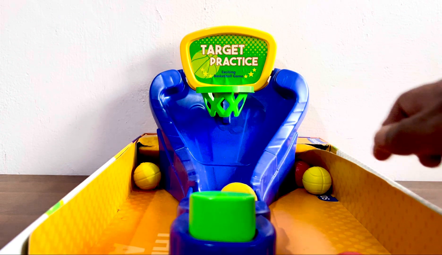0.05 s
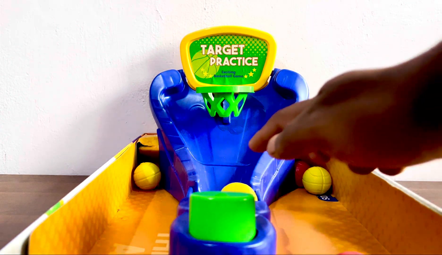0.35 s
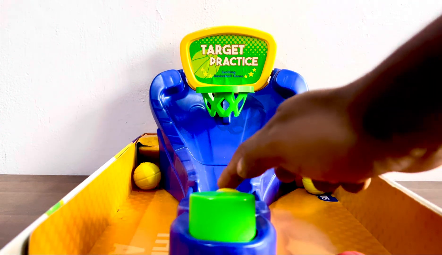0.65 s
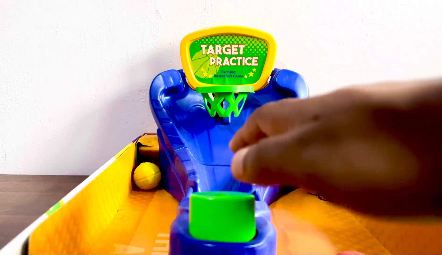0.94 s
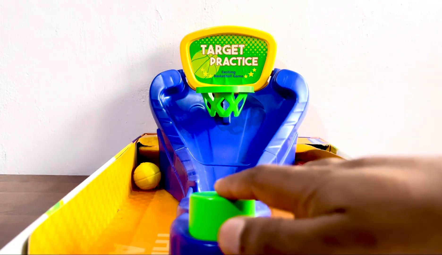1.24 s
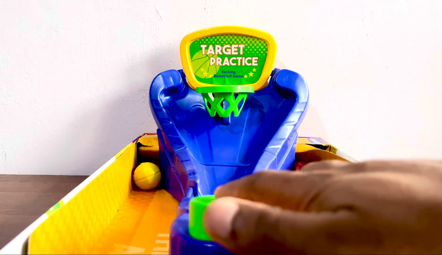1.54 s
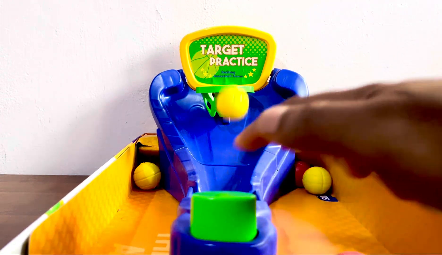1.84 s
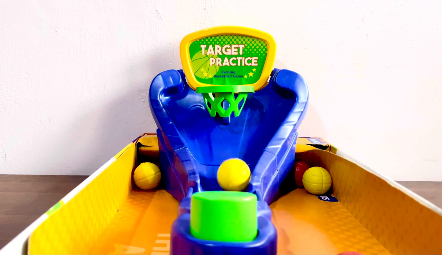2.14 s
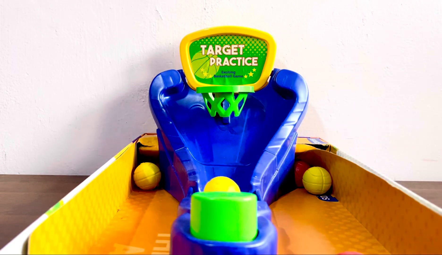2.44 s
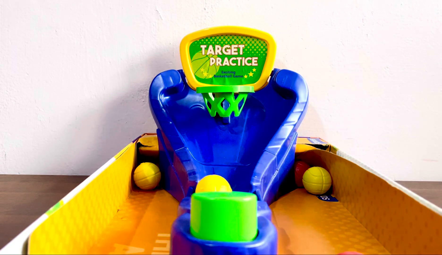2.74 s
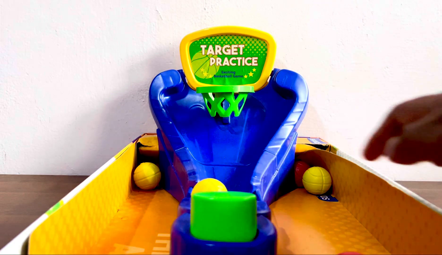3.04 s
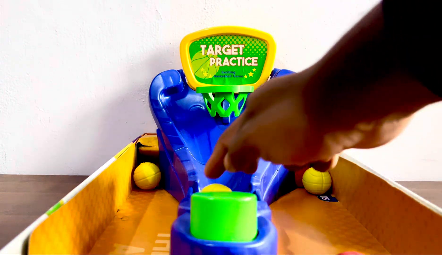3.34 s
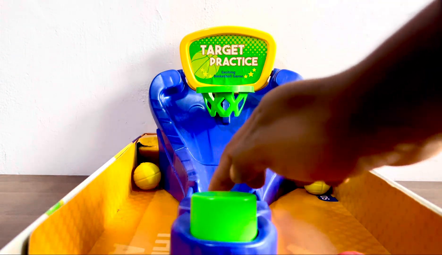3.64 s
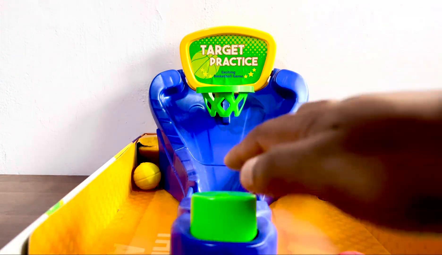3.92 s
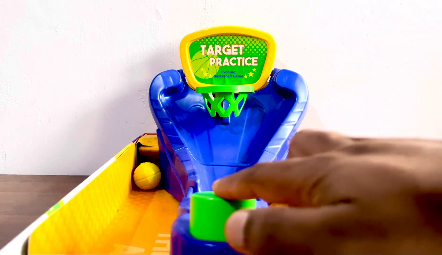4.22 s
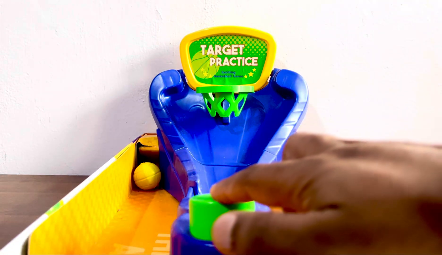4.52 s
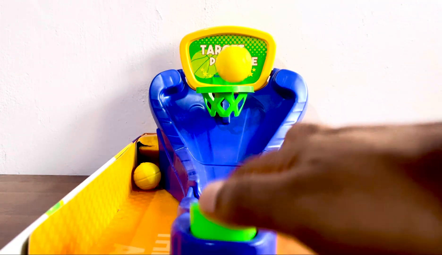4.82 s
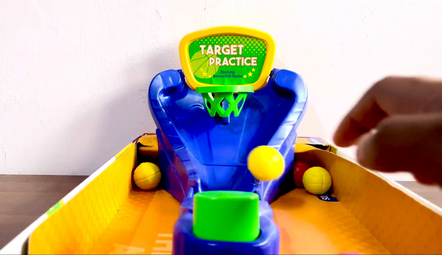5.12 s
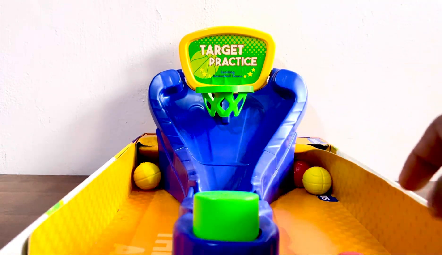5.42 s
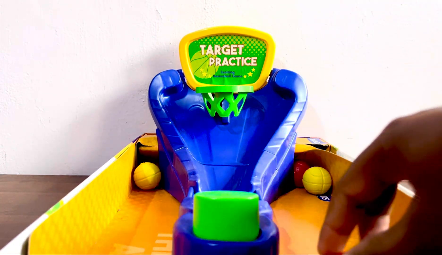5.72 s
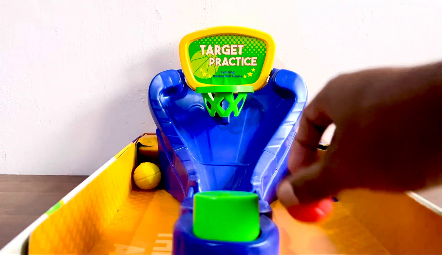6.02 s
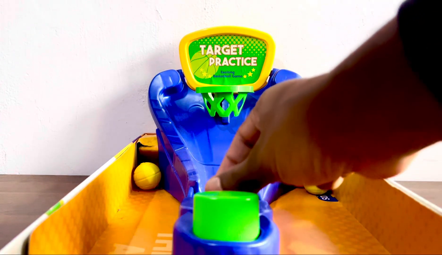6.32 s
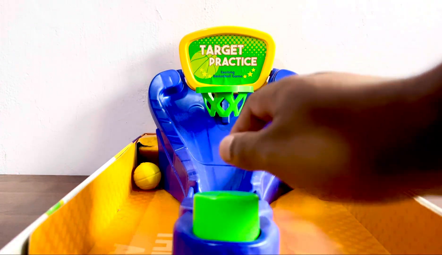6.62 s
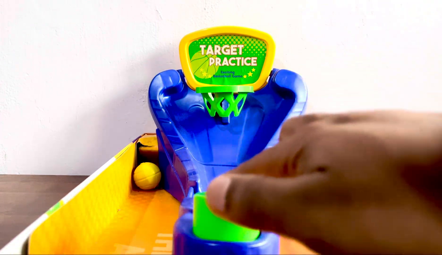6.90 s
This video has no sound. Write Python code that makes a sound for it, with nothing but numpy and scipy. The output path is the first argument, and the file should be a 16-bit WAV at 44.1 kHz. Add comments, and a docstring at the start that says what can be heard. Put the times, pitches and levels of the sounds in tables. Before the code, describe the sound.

In a small, quiet room, close by, fingers jiggle a hollow ball into a plastic tabletop basketball toy with soft clicks and rubbing. A spring lever creaks faintly and snaps, and the ball knocks against backboard and chute before rattling to rest. After more reloading, a second shot clatters, drops into a cardboard tray and rolls. Light handling clicks follow at the end.

```python
"""Soft hollow clicks and rubbing: fingers jiggle a ball into place in a plastic tabletop basketball toy.
Twice a spring lever creaks, slips and slams into its stop, and the hollow ball knocks against backboard
and chute. The first shot rattles back to the launcher; the second drops into a cardboard tray and rolls.
More reloading follows each shot. Every impact excites the damped modes of the thin plastic shell,
and the table booms beneath it, in a small, quiet room."""
import sys
import numpy as np
from scipy import signal
from scipy.fft import rfft, irfft, next_fast_len
from scipy.io import wavfile
from scipy.ndimage import uniform_filter1d

SR = 44100
rng = np.random.default_rng(int(sys.argv[2]) if len(sys.argv) > 2 else 0)


def bounce(signal):
    """Save signal as a 16-bit WAV file at the path given by the first command-line argument."""
    frames = np.transpose(np.atleast_2d(signal))
    limited = np.clip(frames, -1, 1)
    pcm = np.round(limited * 32767).astype(np.int16)
    wavfile.write(sys.argv[1], SR, pcm)


N = 311346


def amp(db):
    """Amplitude ratio of a level in decibels."""
    return 10 ** (np.asarray(db) / 20)

def read(points, hz):
    """Interpolation of a spectrum on a logarithmic frequency axis."""
    f, value = np.transpose(points)
    return np.interp(np.log(hz + 1), np.log(f), value)

def unit(x):
    """Normalisation to a mean energy of one per channel."""
    return x / np.sqrt(np.mean(np.sum(x ** 2, axis=-1)) + 1e-20)

def add(mix, start_s, sound):
    """Superposition: a stereo sound joins the mix at start_s."""
    part = mix[:, max(round(start_s * SR), 0):][:, :sound.shape[1]]
    part += sound[:, :part.shape[1]]

def colour(x, spectrum):
    """Filtering by multiplication in the frequency domain."""
    size = next_fast_len(x.shape[-1], True)
    gain = amp(read(spectrum, np.fft.rfftfreq(size, 1 / SR)))
    return irfft(rfft(x, size) * gain, size)[..., :x.shape[-1]]

# Likeness of the left and right channels: frequency_hz, coherence
COHERENCE = [(100, .95), (400, .85), (1200, .58), (2500, .05), (7000, 0), (13000, .35)]
def noise(size):
    """A diffuse field is coherent at two nearby points for long wavelengths only."""
    padded = next_fast_len(size, True)
    a, b = rfft(rng.standard_normal((2, padded)))
    same = read(COHERENCE, np.fft.rfftfreq(padded, 1 / SR))
    return irfft(np.array([a, same * a + np.sqrt(1 - same ** 2) * b]), padded)[:, :size]

def phase_lag(hz):
    """Left and right phase of a mode: the cosine of their difference equals the coherence."""
    return np.arccos(read(COHERENCE, hz)) * np.array([[0], [1]])

# Spectrum of the still room: frequency_hz, level_db
AIR = [(25, -15), (110, -6), (280, -14), (600, -14), (1200, -11), (1900, -22), (4000, -24), (8000, -37.5),
       (13000, -39), (16000, -70)]
def room_air(level_db=-72):
    """Ambient noise: steady, diffuse and strongest in the bass."""
    return amp(level_db) * unit(colour(noise(N), AIR)) * np.sqrt(N)

# Weight of the hand on toy and table: time_s, level_db
HAND_WEIGHT = [(0.3, -95), (0.55, -64), (1.4, -69), (3.35, -68), (3.8, -63.5), (4.3, -69.5), (5.7, -62.5),
               (6.1, -86.5), (6.6, -74)]
# Spectrum of its rumble: frequency_hz, level_db
THUD = [(35, -13), (110, 1), (380, -3.5), (800, -33), (3000, -70)]
def resting_hand(lumps_db=3, lump_s=0.092):
    """Structure-borne noise: a shifting hand makes a low, lumpy rumble."""
    t, knots = np.arange(N) / SR, np.arange(0, N / SR, lump_s)
    lumps = lumps_db * np.interp(t, knots, rng.standard_normal(len(knots)))
    level = np.interp(t, *np.transpose(HAND_WEIGHT)) + lumps
    return amp(level) * unit(colour(noise(N), THUD)) * np.sqrt(N)

def panel_ring(modes_hz, size, t60=.17):
    """Modal weighting: each spot on the thin panels favours different high modes."""
    t = np.arange(size // 3) / SR
    ring = sum(rng.standard_normal() * np.sin(2 * np.pi * (hz * t + rng.random((2, 1))))
               for hz in modes_hz)
    return np.pad(unit(ring * amp(-60 * t / t60)), ((0, 0), (0, size - len(t))))

# Reverberation time: frequency_hz, t60_s
ROOM_T60 = [(100, .7), (500, 0.48), (1200, .46), (4000, 0.28), (8000, 0.36), (14000, 0.46)]
# Reverberation against the direct sound: frequency_hz, level_db
ROOM_LEVEL = [(100, -0.5), (500, -4.5), (1100, -4), (2500, -0.5), (5000, 2), (13300, -10), (15000, -22)]
def surroundings(modes_hz, size=24576, scatter_db=-9.5, panel_db=-9, wall_s=.0139, wall_db=-12):
    """Impulse response of one spot: reverberation, scatter in the tray, panels, direct sound, echo."""
    t = np.arange(size) / SR
    hz, when, bands = signal.stft(noise(size), SR, nperseg=256)
    t60 = read(ROOM_T60, hz)[:, None]
    bands = bands * amp(read(ROOM_LEVEL, hz)[:, None] - 60 * when / t60)
    bands *= np.sqrt(2 * np.log(1000) / (t60 * SR))  # energy independent of decay time
    response = signal.istft(bands, SR, nperseg=256)[1][:, :size] * (1 - np.exp(-t / 0.0017))
    scatter = noise(size) * np.exp(-t / .011) * np.clip(t / 0.0011 - 1, 0, 1)
    response += amp(scatter_db) * unit(scatter)
    response += amp(panel_db) * panel_ring(modes_hz, size)
    response[:, 0] += 1
    response[:, round(wall_s * SR)] += amp(wall_db)
    return response

# Modes of the table under the toy: pitch_hz, level_db, t60_s
TABLE_MODES = [(77, -42, 0.67), (102, -34, 0.22), (186, -38, 0.16), (275, -34.5, 0.07)]
def table_boom(contacts, gain_db):
    """Mechanical coupling: blows on the toy excite the low modes of the table."""
    t, out = np.arange(SR) / SR, np.zeros((2, N))
    ring = sum(amp(db - 60 * t / t60) * np.sin(2 * np.pi * hz * t) for hz, db, t60 in TABLE_MODES)
    ring = np.tile(ring * (1 - np.exp(-t / 0.0084)) ** 2, (2, 1))
    for start, knock, *_ in contacts:
        add(out, start, amp(knock + gain_db) * ring)
    return out

# Modes of the plastic shell: pitch_hz, gain_db, t60_s
SHELL_MODES = [(521, 3, 0.38), (609.4, 4.5, .25), (866, -2, 0.25), (966, -1, 0.17), (1127, -3, 0.31),
               (1190, -3, .2), (1333, -.5, 0.14), (1426, 4.5, 0.27), (1550, -.5, 0.11), (2223, -1, .06),
               (3280, -4.5, 0.16)]
def shell(force, ring_db):
    """Forced vibration: knocks and rubbing drive the same modes, and so sound hollow and pitched."""
    t, ring = np.arange(SR // 2) / SR, 0
    for hz, db, t60 in SHELL_MODES:
        envelope = 2 * np.log(1000) / (t60 * SR) * amp(db - 60 * t / t60)
        ring = ring + envelope * np.sin(2 * np.pi * hz * t - phase_lag(hz))
    return force + amp(ring_db) * signal.oaconvolve(force, ring, axes=1)[:, :N]

def stroke(t, start, length, rise_s=0.053, fall_s=0.021):
    """Envelope of a rub: linear rise, hold, exponential decay."""
    return np.clip((t - start) / rise_s, 0, 1) * np.exp(-np.maximum(t - start - length, 0) / fall_s)

# The ball rolls or the fingers rub: start_s, length_s, rumble_db, scratch_db
STROKES = [(0.58, 0.32, -39.5, -60), (0.889, 0.29, -59, -109), (2.15, 0.057, -32.5, -50.5),
           (2.313, .18, -33.5, -59.5), (3.442, 0.096, -50.5, -66), (3.522, 0.21, -39.5, -63.5),
           (3.804, 0.29, -47, -88), (4.17, 0.08, -51.5, -67), (4.355, .14, -54, -106.5),
           (5.31, 0.25, -51.5, -62), (5.522, 0.16, -48, -53), (5.766, 0.054, -55.5, -54),
           (6.476, 0.11, -37, -77), (6.615, 0.27, -53, -98)]
PRESS_S = 0.18  # the finger bears on the button this long before each shot
def friction(t, press_db=-55, drag_db=-35.5, drag_db_per_s=271.5, scratch_db=-35, scratch_db_per_s=480):
    """Friction noise follows the load: the strokes, then the press and growing drag before each shot."""
    rumble, scratch = sum(amp([[low], [high]]) * stroke(t, start, length)
                          for start, length, low, high in STROKES)
    for slip, *_ in SHOTS:
        early = np.maximum(slip - t, 0)
        rumble += amp(press_db) * stroke(t, slip - PRESS_S, PRESS_S)
        rumble += amp(drag_db - drag_db_per_s * early) * (t < slip)
        scratch += amp(scratch_db - scratch_db_per_s * early) * (t < slip)
    return rumble, scratch

# Spectra of rumbling and of scratched plastic: frequency_hz, level_db
RUMBLE = [(30, -43), (60, -27.5), (120, -11), (280, -24), (450, 3.5), (700, 2), (1000, 5.5), (1480, 2.5),
          (1850, -15.5), (2600, -18), (5000, -40), (12000, -56.5)]
SCRATCH = [(700, -14), (1800, 4), (3000, 2), (5000, -5), (8300, -10), (11000, -5.5), (13300, -13),
           (15000, -25)]
def rolling(spot, rumble_db=-10, scratch_db=-5, bumps_per_s=420, spread_db=-1.5):
    """Shot noise: the ball's seam and the fingertips make a random stream of tiny, uneven bumps."""
    t, out = np.arange(N) / SR, np.zeros((2, N))
    bumps = (rng.random(N) < bumps_per_s / SR) * amp(spread_db * np.minimum(rng.exponential(1, N), 3))
    grains = noise(N) * signal.lfilter([1], [1, -np.exp(-1 / (0.00023 * SR))], bumps)
    for spectrum, db, level in zip([RUMBLE, SCRATCH], [rumble_db, scratch_db], friction(t)):
        out += amp(db) * uniform_filter1d(level, size=600) * unit(colour(grains, spectrum)) * np.sqrt(N)
    return signal.oaconvolve(out, spot, axes=1)[:, :N]

def flex(t, hz, swell_s, lag_rad):
    """Heavily damped bending: a panel swings for a few cycles, lagging in phase on the right."""
    u = t / swell_s
    return unit(u ** 2 * np.exp(-u) * np.sin(2 * np.pi * hz * t - np.array([[0], [lag_rad]])))

def crack(t, spectrum, rise_s, decay_s):
    """Modal overlap: the many short-lived modes of thin plastic merge into a noise burst."""
    return unit(colour(noise(len(t)), spectrum) * np.exp(-t / decay_s) * (1 - np.exp(-t / rise_s)))

def wall_ring(t, low_hz=1700, high_hz=7400, t60=0.016, count=20):
    """Local resonance: each spot on the thin walls rings briefly with its own modes."""
    hz = low_hz * (high_hz / low_hz) ** rng.random((count, 1, 1))
    modes = np.sin(2 * np.pi * (hz * t + rng.random((count, 2, 1)))) / np.sqrt(hz)
    return unit(np.sum(modes, 0) * amp(-60 * t / t60) * (1 - np.exp(-t / 0.0054)))

def ring_on(contacts, modes, rise_s=0.0032):
    """Free vibration: the modes of a struck part decay exponentially after each blow."""
    out, t = np.zeros((2, N)), np.arange(SR // 2) / SR
    for start, level, *_ in contacts:
        for hz, db, t60 in modes:
            envelope = amp(level + db - 60 * t / t60) * (1 - np.exp(-t / rise_s))
            add(out, start, envelope * np.sin(2 * np.pi * (hz * t + rng.random()) - phase_lag(hz)))
    return out

def contact(start, level, hz, hardness_db, hollow_db):
    """Harder contacts are brighter. Gives start_s, knock_db, pitch_hz, body_db, clack_db, tick_db."""
    return start, level, hz, level + hollow_db, level - 9 + hardness_db, level - 17 + 1.3 * hardness_db

# Spectra of the clack and the higher tick of struck plastic: frequency_hz, level_db
CLACK = [(600, -12.5), (1400, -6), (2100, 9), (3000, -0.5), (4400, -2), (6200, -11.5), (7500, -17),
         (10000, -26)]
TICK = [(4000, -20), (7000, -2), (8500, -5.5), (10300, 2), (13000, -1.5), (14300, -11.5), (16000, -23)]
def blows(contacts, spots, knock_db, rattle_db, body_db, clack_db, tick_db,
          swell_s, rise_s, crack_s, body_hz, ring_db=-4):
    """Impact excitation: each contact flexes panel and hollow base, rattles loose joints and clacks."""
    out, t = np.zeros((2, N)), np.arange(2000) / SR
    for k, (start, knock, hz, body, clack, tick) in enumerate(contacts):
        hit = amp(knock + knock_db) * flex(t, hz, swell_s, lag_rad=0.59)
        hit += amp(knock + rattle_db) * crack(t, RUMBLE, rise_s=.004, decay_s=.008)
        hit += amp(body + body_db) * flex(t, body_hz * rng.uniform(.94, 1.2), 0.0015, lag_rad=0.32)
        hit += amp(clack + clack_db) * crack(t, CLACK, rise_s, crack_s)
        hit += amp(clack + ring_db) * wall_ring(t)
        hit += amp(tick + tick_db) * crack(t, TICK, rise_s, crack_s * 0.92)
        add(out, start, signal.fftconvolve(hit, spots[k % len(spots)], axes=1))
    return out

def nudge(start, level, hz, bite_db=0, brightening=1.827):
    """Nonlinear contact: the clack grows faster than the force, and a fingernail adds bite."""
    clack = brightening * level + bite_db
    return start, level, hz, level - 10, clack, clack - 7 + (clack - level) / 2

# Fingers nudge the ball: start_s, level_db, pitch_hz, bite_db
NUDGES = [(0.616, -14.5, 920, 2.5), (0.632, -19, 900, 11.5), (0.694, -10, 1620, 3.5),
          (0.722, -8.5, 1480, 1), (0.737, -14, 1200, 9.5), (0.775, -6.5, 1160, 4), (0.798, -5.5, 1450, 1),
          (0.843, -10.5, 1070, 3), (0.876, -17.5, 1190, 10), (2.619, -17, 1382, -17), (2.837, -32, 1083, 5),
          (2.997, -21, 1383, 6), (3.327, -23.5, 1400, 2), (3.544, -13.5, 1500, 9.5),
          (3.632, -16, 1295, 12.5), (3.665, -15, 870, 4.5), (3.73, -17, 1450, 4.5),
          (3.841, -22.5, 1035, 5.5), (3.905, -17.5, 1143, 2.5), (4.064, -18.5, 1330, -8),
          (6.352, -14.5, 1055, 6), (6.38, -8.5, 1015, -1.5), (6.385, -12.5, 1376, -7),
          (6.488, -19, 1050, 4.5), (6.522, -20, 1330, 11), (6.604, -18.5, 1253, 4.5), (6.749, -23, 945, 5),
          (6.84, -26.5, 1030, -3)]
def reloading(count=3, above_db=20, spread_db=7, low_hz=880, high_hz=1400):
    """Rattling of a loose body: the ball is nudged, and jiggles at random during every stroke."""
    jiggles = [nudge(start + when * length, rumble + above_db - spread_db * weak,
                     low_hz + pitch * (high_hz - low_hz))
               for start, length, rumble, _ in STROKES for when, weak, pitch in rng.random((count, 3))]
    return [nudge(*row) for row in NUDGES] + jiggles

# Light, sharp contacts of ball, button and fingernails: start_s, clack_db, tick_db
CLICKS = [(1.844, -5, -11), (4.167, -21.5, -30), (4.864, 4.5, -7), (5.438, -21.5, -32), (5.823, -33, -27),
          (5.97, -26.5, -34.5)]
def click(start, clack_db, tick_db, hz=1100):
    """A brief, light contact carries little momentum and hardly moves the panels."""
    return start, clack_db - 6, hz, clack_db - 10, clack_db, tick_db

def seam(from_s=5.32, to_s=5.518, count=11, jitter_s=0.002, spread_db=3, tick_s=.0006):
    """Quasi-periodic impacts: the seam of the rolling ball ticks drily across the cardboard."""
    out, t = np.zeros((2, N)), np.arange(SR // 100) / SR
    for start, (late, size) in zip(np.linspace(from_s, to_s, count), rng.standard_normal((count, 2))):
        tick = amp(-40) * crack(t, TICK, tick_s, tick_s) + amp(-37.5) * crack(t, CLACK, tick_s, tick_s)
        add(out, start + jitter_s * late, amp(spread_db * size) * tick)
    return out

# The ball lands in the tray: start_s, level_db, pitch_hz, hardness_db, ring_db, boom_db
TRAY_LANDINGS = [(5.132, 2, 1410, -7, 0.5, -15), (5.226, 3, 1153, -5.5, -1, -2.5)]
# Modes of the ball on cardboard and of the tray floor: pitch_hz, level_db, t60_s
TRAY_RING = [(1456, -4, 0.048), (1750, -3, 0.016), (2120, -8.5, 0.025), (2495, -7, 0.014)]
TRAY_BOOM = [(104.8, -42.5, 0.36), (184.5, -40.5, 0.37), (246.4, -40, 0.25)]
def tray(spots, rise_s=0.00038):
    """Impact on a damped plate: the ball clacks and rings briefly while the cardboard floor booms."""
    landings = [contact(*row[:4], hollow_db=-6.5) for row in TRAY_LANDINGS]
    out = blows(landings, spots, knock_db=-2, rattle_db=-6, body_db=-3, clack_db=0, tick_db=-2,
                swell_s=.0005, rise_s=.0004, crack_s=.0016, body_hz=480)
    t = np.arange(SR // 8) / SR
    for (start, level, _, _, ring_db, boom_db), spot in zip(TRAY_LANDINGS, spots):
        ring = sum(amp(db - 60 * t / t60) * np.sin(2 * np.pi * hz * t + rng.random((2, 1)))
                   for hz, db, t60 in TRAY_RING)
        ring = unit(ring * (1 - np.exp(-t / rise_s)))
        add(out, start, amp(ring_db) * signal.fftconvolve(ring, spot, axes=1))
        out += ring_on([(start, level + boom_db)], TRAY_BOOM)
    return out

# Modes of the hollow ball: pitch_hz, level_db, t60_s
BALL_MODES = [(1480, 1, .06), (1750, -2, .06), (2215, 0, .08), (2520, -5, .05), (3450, -5, .04)]
def ball_ring(contacts, spots, gain_db, rise_s=0.00083, detune=0.016):
    """A thin sphere rings with a mix of modes that changes with the point of impact."""
    out, t = np.zeros((2, N)), np.arange(SR // 10) / SR
    for k, (start, _, _, _, clack, _) in enumerate(contacts):
        ring = 0
        for hz, db, t60 in BALL_MODES:
            envelope = amp(db - 60 * t / t60) * rng.standard_normal()
            pitch = hz * (1 + detune * rng.standard_normal())
            ring = ring + envelope * np.sin(2 * np.pi * (pitch * t + rng.random((2, 1))))
        ring = unit(ring * (1 - np.exp(-t / rise_s)))
        add(out, start, amp(clack + gain_db) * signal.fftconvolve(ring, spots[k % len(spots)], axes=1))
    return out

# The ball drops into the lower chute: start_s, level_db
CHUTE_LANDINGS = [(1.916, 4), (2.188, -4.5)]
# Modes of the chute: pitch_hz, level_db, t60_s
CHUTE_MODES = [(614, -29, .45), (996, -35, .4)]
def chute():
    """Light damping lets the chute hum on after each landing."""
    return ring_on(CHUTE_LANDINGS, CHUTE_MODES)

# The ball rocks to rest in the launcher: start_s, level_db, pitch_hz
SETTLES = [(2.311, -3.5, 1010), (2.3215, -3.5, 1460), (2.3535, -3.5, 1310), (2.366, -10.5, 1130),
           (2.391, -7, 1560), (2.421, -10.5, 818), (2.446, -19.5, 1290), (2.461, -18.5, 1133)]
# It strikes backboard, hoop and chute: start_s, level_db, pitch_hz, hardness_db, hollow_db
BOUNCES = [(1.764, 2, 1150, 0.5, -9), (1.777, -2, 1160, 3.5, -23), (1.787, 8, 980, 3.5, -7),
           (1.8, 2.5, 1400, 6.5, -18), (1.9157, 14, 1244, -2, -8.5), (1.9945, 10.5, 970, -5, -27),
           (2.054, 4, 960, -5, -33.5), (2.069, -11, 1040, 3, -27), (2.108, -3, 1260, -4, -1.5),
           (2.131, -3.5, 1385, -1, 0.5), (2.188, -9, 1100, -3.5, -4), (2.264, -19, 880, 3, -2),
           (4.8572, 8, 1100, 2, -4), (4.882, 2, 1230, 7, -9.5), (4.966, -4.5, 1150, 1.5, -13.5),
           (5.0177, 15, 1013, -1, -11)]
def ball_flight():
    """Inelastic collisions: the ball bounces through the toy and settles with light, hard knocks."""
    settles = [contact(*row, hardness_db=2, hollow_db=-11) for row in SETTLES]
    return [contact(*row) for row in BOUNCES], settles

# Tones of the bending lever: pitch_hz, level_db
CREAK_TONES = [(517, -4), (968, 0.5), (1152, -5.5)]
def creak(spot, length_s=.12, level_db=-48, waver=0.017):
    """Random frequency modulation: the bent lever sings unsteadily just before it slips."""
    out, t = np.zeros((2, N)), np.arange(SR // 4) / SR
    for slip, *_ in SHOTS:
        drift = 1 + waver * np.sqrt(len(t)) * unit(uniform_filter1d(rng.standard_normal(len(t)), 400))
        tones = sum(amp(db) * np.sin(2 * np.pi * hz * np.cumsum(drift) / SR) for hz, db in CREAK_TONES)
        tones *= amp(level_db) * stroke(t, 0, length_s)
        add(out, slip - length_s, signal.fftconvolve(tones[None], spot, axes=1))
    return out

# The lever slips and flies to its stop: start_s, travel_s, scrape_db, slam_db, pitch_hz
SHOTS = [(1.621, .0225, 5, 9, 1270), (4.703, .033, 4.5, 8, 1140)]
def lever(rebound_s=0.012):
    """Release of elastic energy: a touch, a click of the catch, two scrapes, a slam and a rebound."""
    catches, scrapes, slams = [], [], []
    for slip, travel, scrape, slam, hz in SHOTS:
        catches.append(click(slip - .35 * travel, clack_db=-12, tick_db=-12))
        catches.append(nudge(slip - PRESS_S, level=-29, hz=950))
        scrapes.append(contact(slip, scrape, hz=1270, hardness_db=1.2, hollow_db=-8))
        scrapes.append(contact(slip + .3 * travel, scrape - 2, hz=850, hardness_db=0.75, hollow_db=-8))
        slams.append(contact(slip + travel, slam, hz, hardness_db=9.5, hollow_db=-20))
        scrapes.append(contact(slip + travel + rebound_s, slam - 7, hz, hardness_db=0, hollow_db=-11.5))
    return catches, scrapes, slams

# Modes of the spring lever: pitch_hz, level_db, t60_s
LEVER_MODES = [(1400, -28, .1), (4204, -42, .26), (5840, -42, .1)]
def lever_ring(slams):
    """A spring stopped abruptly vibrates at its natural frequencies."""
    return ring_on(slams, LEVER_MODES)

def scene(panel_low_hz=1900, panel_high_hz=7200, panel_modes=48):
    """Superposition of handling, bounces and lever, sounding through the toy over the room's air."""
    spacing = (np.arange(panel_modes) + rng.random(panel_modes)) / panel_modes
    modes_hz = panel_low_hz * (panel_high_hz / panel_low_hz) ** spacing
    spots = [surroundings(modes_hz) for _ in range(9)]
    catches, scrapes, slams = lever()
    bounces, settles = ball_flight()
    nudges = reloading()
    clicks = [click(*row) for row in CLICKS] + catches
    toy = blows(scrapes, spots, knock_db=-4.5, rattle_db=1, body_db=-5.5, clack_db=-1, tick_db=4,
                swell_s=.002, rise_s=.0055, crack_s=.0035, body_hz=454)
    toy += blows(slams, spots[4:], knock_db=.5, rattle_db=-7, body_db=-10, clack_db=-9, tick_db=1,
                 swell_s=.00044, rise_s=.0011, crack_s=.0023, body_hz=523)
    toy += blows(bounces + settles, spots, knock_db=-.5, rattle_db=-6.5, body_db=-2, clack_db=-3.5,
                 tick_db=-2, swell_s=.0008, rise_s=.0008, crack_s=.0026, body_hz=550)
    toy += blows(nudges + clicks, spots, knock_db=-2.5, rattle_db=.5, body_db=-3, clack_db=-8.5,
                 tick_db=-3, swell_s=.00088, rise_s=.0014, crack_s=.0028, body_hz=605, ring_db=-11.5)
    rings = lever_ring(slams) + chute()
    booms = table_boom(slams, -6.5) + table_boom(bounces + settles, -23) + table_boom(nudges, -31)
    background = resting_hand() + room_air()
    rubbing = shell(rolling(spots[0]), ring_db=3) + creak(spots[1])
    for contacts, gain_db in (nudges, -4), (settles, -3), (bounces, -13.5):
        rings += ball_ring(contacts, spots, gain_db)
    return background + booms + rubbing + rings + tray(spots) + seam() + shell(toy, ring_db=-.5)

# Stereo balance: frequency_hz, left_minus_right_db
BALANCE = [(200, -1.5), (700, -3), (1300, -0.5), (2400, 0), (4400, 8.5), (6500, 5), (9000, 1.5),
           (15000, -2.5)]
def record(dry, ceiling=.9, cutoff_hz=16200):
    """Equalisation brightens the left channel, soft saturation rounds peaks, a low-pass ends the band."""
    heard = np.array([colour(channel, [(hz, side * db / 2) for hz, db in BALANCE])
                      for channel, side in zip(dry, (1, -1))])
    limited = heard / (1 + (heard / ceiling) ** 8) ** (1 / 8)
    low_pass = signal.firwin(255, cutoff_hz, window=("kaiser", 8), fs=SR)
    return signal.oaconvolve(limited, low_pass[None], "same")

dry = scene()
out = record(dry)
bounce(out)
```